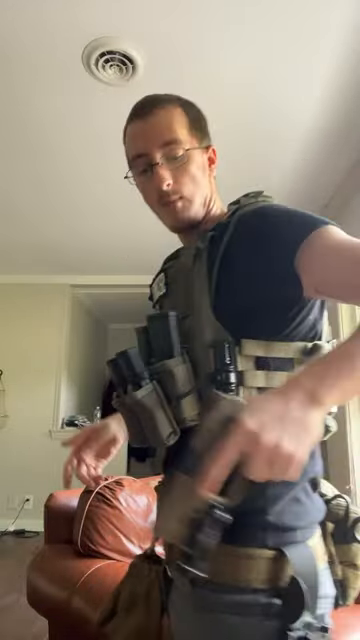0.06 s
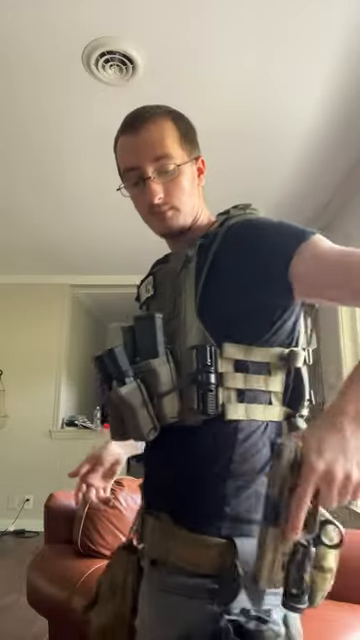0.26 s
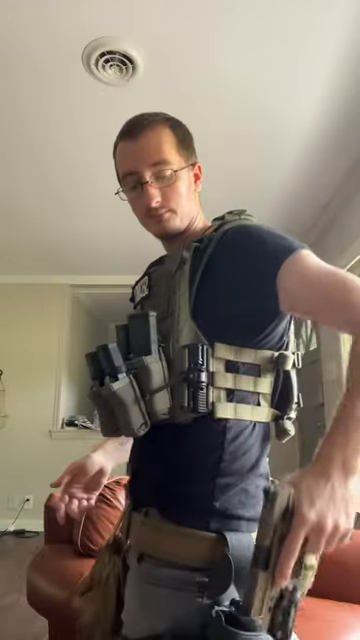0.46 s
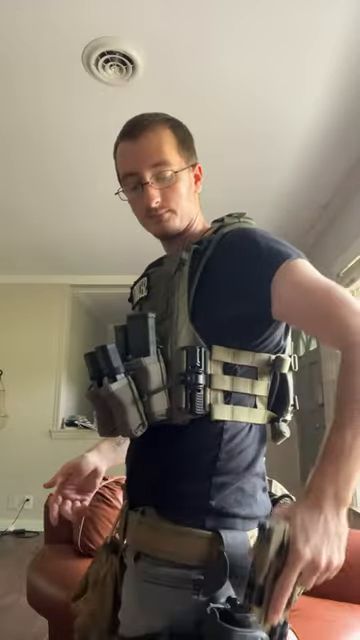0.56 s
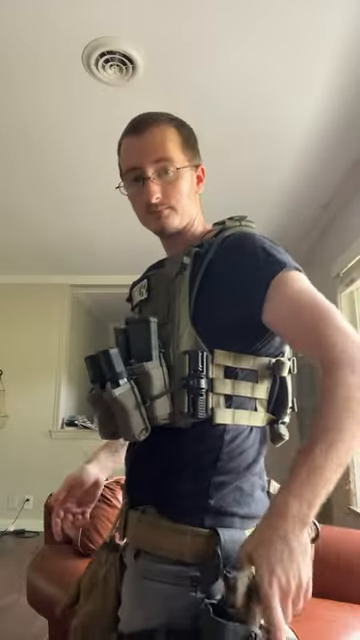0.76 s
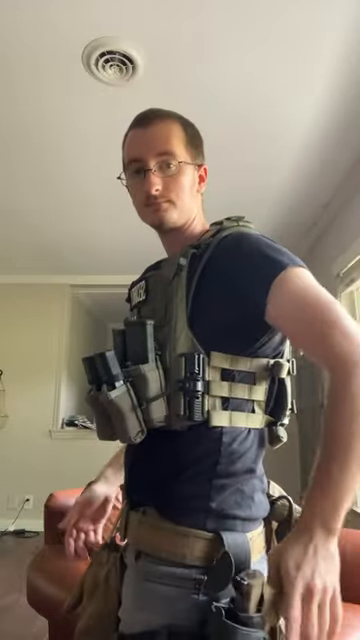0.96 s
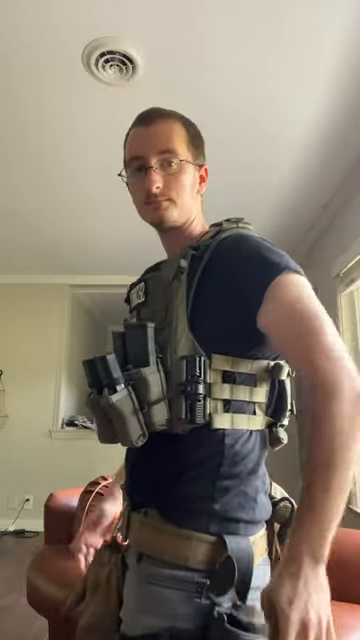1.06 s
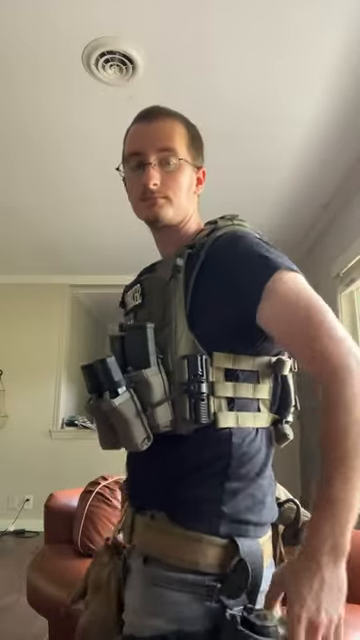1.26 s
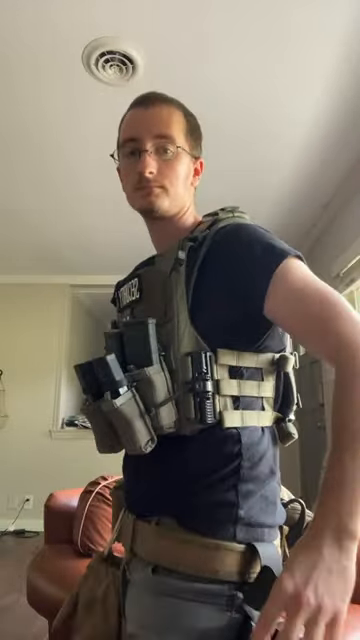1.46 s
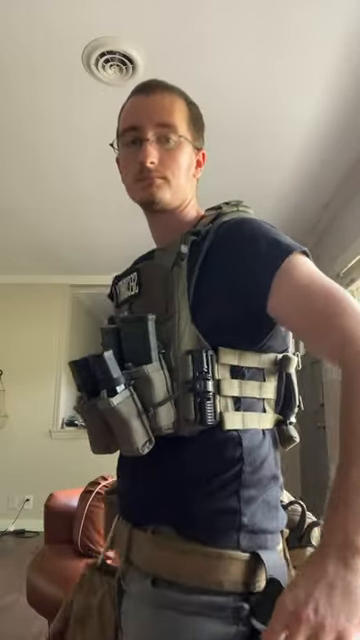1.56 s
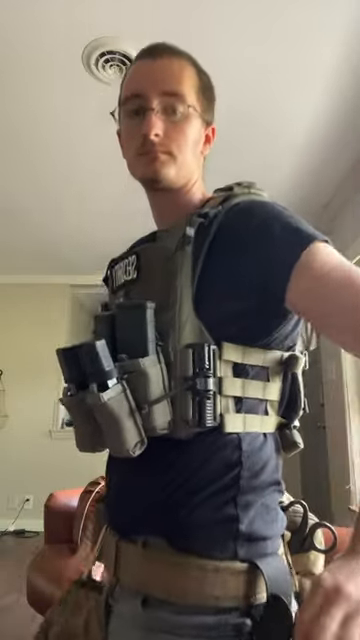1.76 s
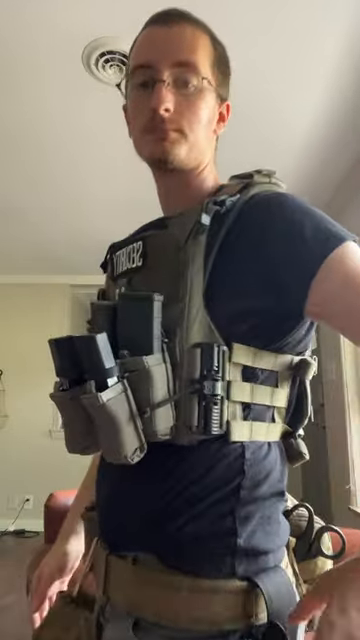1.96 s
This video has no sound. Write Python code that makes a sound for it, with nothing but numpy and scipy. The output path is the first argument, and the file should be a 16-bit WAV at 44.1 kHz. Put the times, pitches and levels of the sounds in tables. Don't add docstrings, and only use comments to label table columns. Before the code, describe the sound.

Hard plastic holster clatters and snaps as a pistol seats, followed by small ticks and a sharp click

```python
import sys
import numpy as np
from scipy import signal
from scipy.io import wavfile

SR = 44100
rng = np.random.default_rng(int(sys.argv[2]) if len(sys.argv) > 2 else 0)


def volts(x):
    e = np.asarray(x, float) / 20
    return 10 ** e


def master(y):
    cut = np.clip(np.atleast_2d(y).T, -1, 1)
    pcm = np.round(cut * 32767)
    wavfile.write(sys.argv[1], SR, pcm.astype(np.int16))


N = 88552

# pitch_hz, density_db (dB per Hz)
AIR_COLOUR = [(25, -6), (60, -13.5), (120, -11.5), (400, -20), (1100, -16.5), (3500, -26), (6500, -37),
              (9500, -124)]
# pitch_hz, width_hz, level_db
HUM_TONES = [(90.3, 3.5, -65), (121.2, 1.8, -65), (182.5, 3, -59)]
# pitch_hz, t60_s
ROOM_DECAY = [(250, 0.39), (700, 0.23), (2000, 0.61), (5000, 0.61), (9000, 0.56), (14000, 0.33)]
# pitch_hz, level_db
ROOM_COLOUR = [(300, -8.5), (800, -5.5), (2500, -14.5), (6500, -15), (13000, -13)]
# delay_s, level_db
EARLY_ECHOES = [(.0045, -57), (.0148, -14), (.0215, -23)]
# start_s, level_db
RUSTLE_LEVEL = [
    (0, -94),
    (.02, -45),
    (.12, -53),
    (.3, -59),
    (1.45, -82),
    (1.53, -53.5),
    (1.7, -51.5),
    (1.8, -47),
    (2.0, -42.5),
]
# pitch_hz, density_db (dB per Hz)
CLOTH_COLOUR = [(240, -49), (400, -0.5), (523, -2.5), (854, 5), (1600, -3), (7170, -14), (14000, -91)]
# start_s, level_db, pitch_hz, t60_s
JINGLES = [(0.03, -53.5, 7830, 0.23), (0.47, -45, 4900, 0.0074), (.604, -18.5, 2340, 0.074),
           (0.76, -23, 6710, 0.02), (.727, -14, 3300, .02), (.727, -9.5, 5700, .015),
           (1.807, -11.5, 2960, 0.017), (1.806, -15.5, 6000, 0.026), (1.63, -42, 8300, 0.026),
           (1.116, -25, 1720, 0.0083), (1.15, -34, 2580, 0.2), (1.806, -14, 7460, 0.0099),
           (1.81, -23, 2093, 0.14), (.727, -17.5, 2190, 0.054), (.74, -33.5, 1350, 0.32),
           (.745, -29.5, 380, 0.17), (.56, -27, 364, 0.14), (1.82, -31.5, 560, .25),
           (1.83, -26.5, 3150, 0.22), (1.82, -29.5, 8800, 0.09)]
# start_s, peak_db, pitch_hz, t60_s
SHELL_KNOCKS = [(.018, -36, 611, 0.066), (.036, -37, 579, 0.078), (.252, -40, 507, 0.03),
                (.516, -26.5, 732, 0.12), (.557, -7, 645, 0.039), (.568, -14, 614, 0.041),
                (.613, -14, 550, 0.022), (.621, -9.5, 573, 0.046), (.632, -20, 593, 0.057),
                (.636, -12.5, 575, 0.025), (.728, -28, 540, 0.072), (.745, -14.5, 640, 0.046),
                (.755, -26.5, 640, 0.11), (.793, -16.5, 712, 0.032), (1.033, -37.5, 651, .07),
                (1.069, -32.5, 708, 0.096), (1.085, -26.5, 711, 0.079), (1.102, -24, 763, 0.048),
                (1.112, -22.5, 739, 0.051), (1.124, -28, 753, 0.03), (1.513, -34, 724, 0.046),
                (1.534, -36, 705, 0.04), (1.58, -36.5, 780, 0.043), (1.632, -35, 787, 0.034),
                (1.808, -12, 735, 0.074), (1.819, -15.5, 770, 0.046), (1.832, -21, 748, 0.071),
                (1.861, -25, 743, 0.072), (1.897, -33.5, 815, 0.22)]
# pitch_ratio, level_db
HOLLOW_MODES = [(0.52, -20), (0.641, -11.5), (.83, -9.5), (1.003, -1), (1.172, -8), (1.5, -19),
                (2.1, -11.5)]
# start_s, peak_db, centre_hz, top_db
HARD_SNAPS = [(.5155, -38, 4870, -45), (0.5619, -11, 3480, -18), (0.571, -12, 3020, -22),
              (0.587, -16, 2640, -28), (0.6064, -3.5, 3160, -23), (.608, -1, 4700, -14),
              (0.612, -20, 4500, -12), (0.617, -18, 2500, -20), (0.6284, -5.5, 3000, -19),
              (0.6482, -19, 2700, -20), (0.7261, -3, 6530, -10), (0.7275, -5.5, 2500, -10),
              (0.7307, 2, 6700, -10), (0.7453, -14, 2980, -11), (.7915, -8, 7600, -10),
              (0.7922, -15.5, 4400, -8), (1.0316, -34, 4800, -40), (1.046, -38, 4800, -40),
              (1.0715, -25.5, 5050, -7), (1.086, -33, 5020, -12.5), (1.1149, -9, 4720, 6.5),
              (1.1188, -21, 3250, 5), (1.121, -19, 2590, 2), (1.1281, -16, 3500, -10),
              (1.509, -39, 5500, -40), (1.578, -40, 2100, -40), (1.597, -35, 3500, -45),
              (1.63, -28, 7700, -4), (1.8072, 2, 6460, -8), (1.8081, -7, 7350, 2), (1.809, -1.5, 2900, -14),
              (1.821, -11.5, 2040, -35), (1.864, -11, 5400, -20)]
# start_s, peak_db, ring_hz, treble_db, rattle_ms
HOLSTER_CONTACTS = [(0.0275, -53, 2960, -14, 6.6), (0.036, -39, 2920, -12, 8.8),
                    (.2525, -48, 2000, -17, 3.4), (0.5144, -24.5, 2600, -6, 0.71),
                    (0.556, -13.5, 2470, 2.5, 2.5), (0.5609, -10.5, 2960, -1, 2.9),
                    (0.571, -12.5, 2960, -13.5, 3.6), (0.586, -17, 2270, -18.5, 4),
                    (0.6026, -7, 3045, 0.5, 7.8), (0.6106, -14.5, 2130, 5, 8.2), (0.626, -19, 2650, -9, 2),
                    (0.6492, -31.5, 2420, -24, 2.7), (0.7259, -4, 2230, 5, 2.4),
                    (0.7406, -9, 2940, -16, 12), (0.7907, -12, 3150, 0.5, 4.5)]
# start_s, peak_db, ring_hz, treble_db, rattle_ms
HAND_CONTACTS = [(1.0318, -35.5, 2390, -0.5, 2.8), (1.0445, -45, 3070, 10, 1.2), (1.066, -39, 2240, 6, 8.1),
                 (1.072, -33, 2000, -3, 4.6), (1.0843, -37, 2210, 10, 1), (1.1, -43, 2970, 6, 1.5),
                 (1.112, -23.5, 2340, 1.5, 2.3), (1.1161, -15, 2385, 3, 6.1), (1.1252, -30, 2560, -10, 1.3),
                 (1.51, -31.5, 2140, -2, 1.3), (1.5264, -25.5, 2470, -11.5, 4.7),
                 (1.5774, -29.5, 1990, -19, 1.9), (1.5949, -31.5, 3120, -14, 2.9),
                 (1.6275, -26.5, 3000, -4, 4.4), (1.795, -27, 2300, 2, 4.4), (1.8, -24, 2820, -1, 3),
                 (1.805, -6.5, 2700, 5, 1.54), (1.8078, -3.5, 2170, -27, 1.2), (1.8198, -12, 2870, -7, 2.3),
                 (1.8625, -15, 5800, -21, 1.5)]
# pitch_ratio, level_db, t60_s
RING_MODES = [(.4, -8.5, 0.0092), (.55, -5.5, 0.0045), (.75, -7.5, 0.01), (1.0, 0.5, 0.01),
              (1.3, -4, 0.0053)]
# pitch_hz, level_db, t60_s
TREBLE_MODES = [(3350, -0.5, 0.0047), (4310, -1.5, 0.0066), (4900, 1.5, 0.0047), (5800, -3.5, 0.009),
                (6360, -1, 0.0044), (7260, 3.5, 0.0022), (8760, -1, 0.0015), (9330, -7, 0.0024)]

BAND_EDGES_HZ = 22 * 2 ** np.arange(0, 9.9, 1 / 3)
AIR_DB, ROOM_BUILD_S = -51, 0.011
JINGLE_WIDTH_HZ = 240
KNOCK_PUSH_MS, SIDE_LOSS = 1.01, 1.18
SNAP_CYCLES, CRACK_MS, CRACK_DB = 6.5, 0.74, -19.5
TICKS_PER_S, CLICK_DB, RISE_MS = 9000, -2.5, 0.21
DETUNE = 0.07
SETTLE_DB, SETTLE_MS = -14.5, 22.2
DULL_DB_PER_OCTAVE, DULL_FROM_HZ = 0.52, 5360
TOP_HZ, TOP_DB = 9500, -18.5
BUCKLE_FROM_S, BUCKLE_LOW_DB_PER_OCTAVE = 1.4, 8
HOLSTER_LOW_HZ, BUCKLE_LOW_HZ = 255, 400
MIC_LOW_HZ, MIC_HIGH_HZ = 52, 15650


def in_time(rows):
    return np.interp(np.arange(N) / SR, *np.transpose(rows))


def at_hz(points, hz):
    table_hz, value = np.transpose(points)
    return np.interp(np.log(hz), np.log(table_hz), value)


def rms_one(x):
    return x / np.sqrt(np.mean(x ** 2) + 1e-20)


def highpass(x, order, hz):
    return signal.sosfilt(signal.butter(order, hz, "high", fs=SR, output="sos"), x)


def ring(x, hz, t60):
    radius = volts(-60 / (max(t60, .001) * SR))
    w = 2 * np.pi * hz / SR
    return signal.lfilter([0, np.sin(w)], [1, -2 * radius * np.cos(w), radius * radius], x)


def struck(ticks, hz, t60):
    x = ring(ticks, hz, t60)
    return x * np.sqrt(t60 * SR / (12 * np.log(10)) / np.sum(x ** 2))


def top(x):
    return highpass(x, 2, TOP_HZ)


def bands(white, gain):
    total = 0
    for k, (low, high) in enumerate(zip(BAND_EDGES_HZ, BAND_EDGES_HZ[1:])):
        sos = signal.butter(2, [low, high], "band", fs=SR, output="sos")
        total = total + gain(np.sqrt(low * high)) * signal.sosfilt(sos, white[k % 2])
    return total


def add(out, s, x):
    i = int(s * SR)
    out[i:i + len(x)] += x[:N - i]


def air():
    white = rng.standard_normal((3, N + SR))
    out = volts(AIR_DB) * rms_one(bands(white, lambda hz: volts(at_hz(AIR_COLOUR, hz)))[SR:])
    for hz, width, db in HUM_TONES:
        out = out + volts(db) * rms_one(ring(white[2], hz, 1.57 / width)[SR:])
    return out


def room(x):
    t = np.arange(SR) / SR
    white = rng.standard_normal((2, SR))
    tail = bands(white, lambda hz: volts(at_hz(ROOM_COLOUR, hz) - 60 * t / at_hz(ROOM_DECAY, hz)))
    response = tail * (1 - np.exp(-(t / ROOM_BUILD_S) ** 2)) / 20
    response[0] = 1
    for s, db in EARLY_ECHOES:
        response[int(s * SR)] += volts(db)
    return signal.fftconvolve(x, response)[:N]


def rustle():
    grain_level = np.minimum(rng.exponential(1, N // 64 + 1), 3)
    grains = rng.standard_normal((2, N)) * volts(2.6 * np.repeat(grain_level, 64)[:N])
    return volts(in_time(RUSTLE_LEVEL)) * rms_one(bands(grains, lambda hz: volts(at_hz(CLOTH_COLOUR, hz))))


def jingle():
    out, t = np.zeros(N), np.arange(SR // 6) / SR
    for s, db, hz, t60 in JINGLES:
        chatter = rms_one(ring(rng.standard_normal(len(t)), hz, 2.2 / JINGLE_WIDTH_HZ))
        attack = np.minimum(t * 2000, 1)
        add(out, s, volts(db - 60 * t / max(t60, .003)) * attack * chatter)
    return out


def knocks():
    out, t = np.zeros(N), np.arange(SR // 8) / SR
    ratio, level_db = np.transpose(HOLLOW_MODES)[:, :, None]
    for s, db, hz, t60 in SHELL_KNOCKS:
        phase = rng.uniform(0, 2 * np.pi, ratio.shape)
        fall_db = 60 * t / max(t60, .01) * (1 + SIDE_LOSS * abs(ratio - 1))
        thin_db = (s > BUCKLE_FROM_S) * BUCKLE_LOW_DB_PER_OCTAVE * np.minimum(np.log2(ratio), 0)
        modes = volts(level_db - fall_db + thin_db) * np.sin(2 * np.pi * hz * ratio * t + phase)
        push = 1 - np.exp(-t * 1000 / KNOCK_PUSH_MS)
        add(out, s, volts(db) * push * np.sum(modes, axis=0))
    return out


def snaps():
    out, t = np.zeros(N), np.arange(SR // 100) / SR
    click = 1. * (t == 0)
    for s, db, hz, top_db in HARD_SNAPS:
        soften = signal.butter(2, 1.49 * hz, fs=SR, output="sos")
        body = signal.sosfilt(soften, ring(click, hz, SNAP_CYCLES / hz))
        burst = rng.standard_normal(len(t)) * np.exp(-t * 1000 / CRACK_MS)
        add(out, s, volts(db) * (body + volts(top_db + CRACK_DB) * top(burst)))
    return out


def contacts():
    out, t = np.zeros(N), np.arange(SR // 12) / SR
    for s, db, hz, treble_db, ms in [*HOLSTER_CONTACTS, *HAND_CONTACTS]:
        chance, height = rng.random((2, len(t)))
        sway = rng.standard_normal(len(TREBLE_MODES))
        shape = np.exp(-(t * 1000 / max(ms, .3)) ** 2) + volts(SETTLE_DB) * np.exp(-t * 1000 / SETTLE_MS)
        rise = 1 - np.exp(-t * 1000 / RISE_MS)
        ticks = (chance < TICKS_PER_S / SR) * (2 * height - 1) * shape * rise
        low, high = 0, 0
        for k, (ratio, mode_db, t60) in enumerate(RING_MODES):
            low = low + (-1) ** k * volts(mode_db) * struck(ticks, hz * ratio, t60)
        for k, (mode_hz, mode_db, t60) in enumerate(TREBLE_MODES):
            dull_db = DULL_DB_PER_OCTAVE * db * max(np.log2(mode_hz / DULL_FROM_HZ), 0)
            mode = struck(ticks, mode_hz * (1 + DETUNE * sway[k]), t60)
            high = high + (-1) ** k * volts(mode_db + dull_db) * mode
        crack = top(ticks)
        high = high + volts(TOP_DB + DULL_DB_PER_OCTAVE * db) * crack / np.sqrt(np.sum(crack ** 2))
        add(out, s, volts(db + CLICK_DB) * (low + volts(treble_db) * high))
    return out


def scene():
    gear = contacts() + snaps() + knocks() + jingle()
    holster = highpass(gear, 4, HOLSTER_LOW_HZ)
    buckle = highpass(gear, 4, BUCKLE_LOW_HZ)
    gear = np.where(np.arange(N) < BUCKLE_FROM_S * SR, holster, buckle)
    return (room(gear) + rustle() + air())[None]


def roll_off(x):
    return signal.sosfilt(signal.butter(12, 16640, fs=SR, output="sos"), x)


def record(dry):
    x = np.tanh(highpass(dry, 4, MIC_LOW_HZ))
    x = signal.sosfilt(signal.cheby1(10, 1, MIC_HIGH_HZ, fs=SR, output="sos"), x)
    return roll_off(x)


dry = scene()
out = record(dry)
master(out)
```